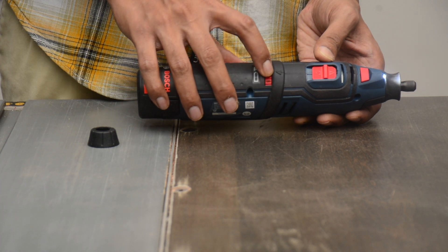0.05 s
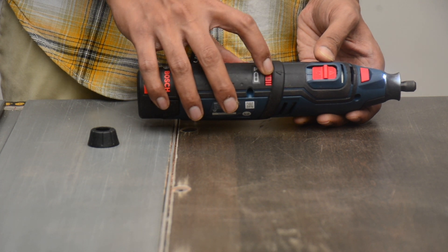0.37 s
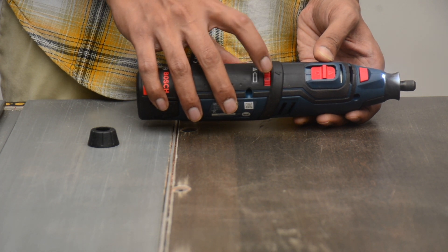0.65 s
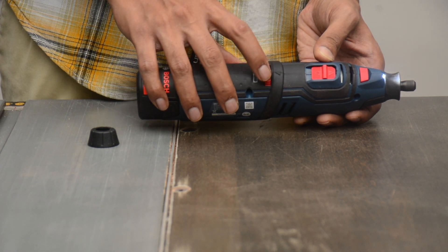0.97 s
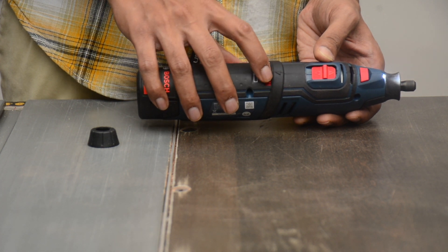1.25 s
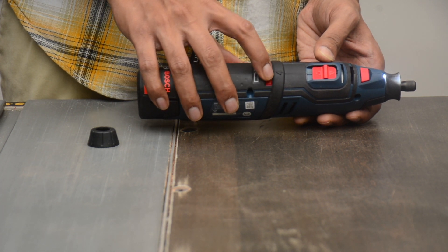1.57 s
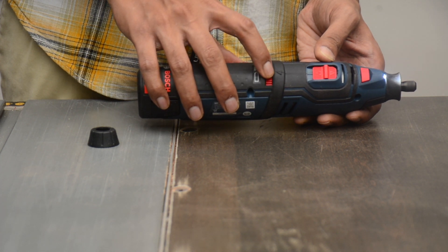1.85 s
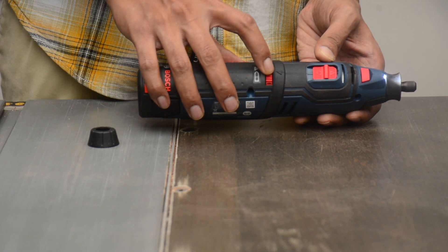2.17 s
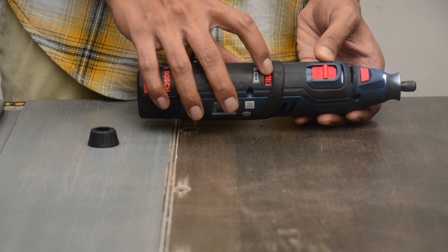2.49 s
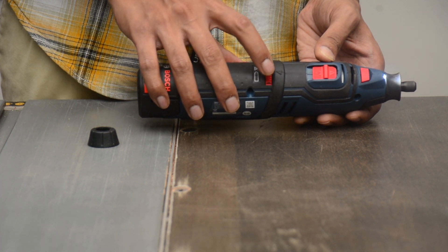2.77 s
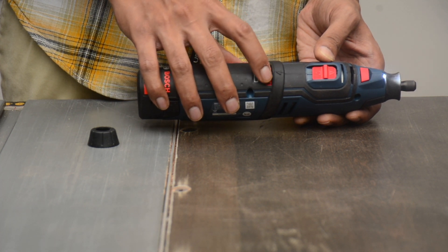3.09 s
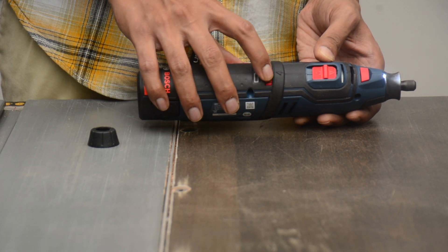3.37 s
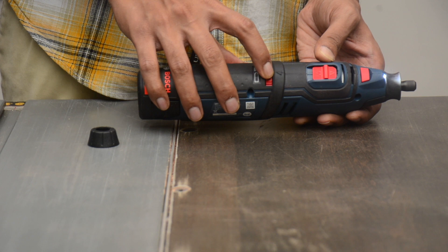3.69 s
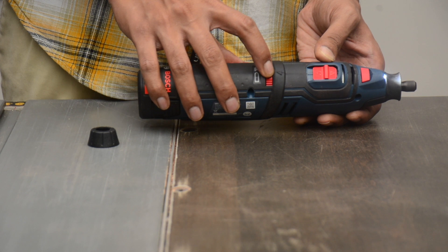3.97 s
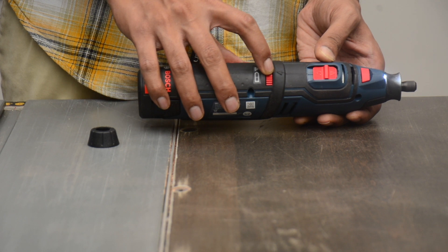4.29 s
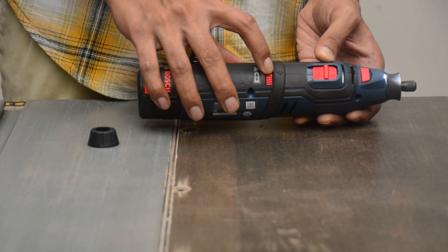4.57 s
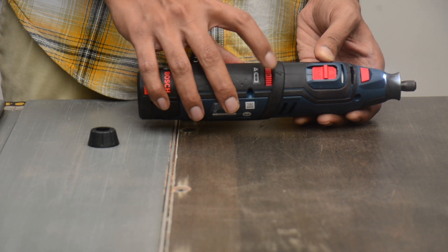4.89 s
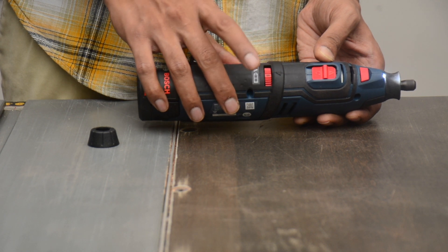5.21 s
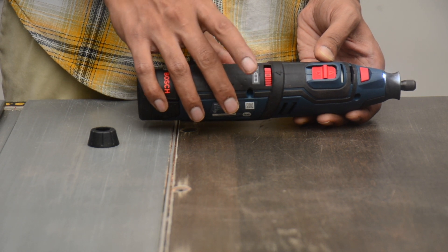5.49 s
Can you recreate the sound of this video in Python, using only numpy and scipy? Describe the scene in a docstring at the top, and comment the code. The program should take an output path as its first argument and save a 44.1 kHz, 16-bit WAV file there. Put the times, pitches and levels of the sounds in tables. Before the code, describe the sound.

A small cordless rotary tool runs with no load for the whole five and a half seconds, heard close with light workshop reflections. Its sound is a high motor whine over a steady rush of air, with a weaker hum and fine electric buzz underneath. At about 0.1 seconds the pitch glides up a little with a brief squeak, then holds. It steps up again at about 1.6, 2.0 and 2.3 seconds, and the whine becomes more prominent. A last rise comes at about 3.5 seconds, with the whine strongest around 3.7 seconds. Each rise brings a slight flutter, rasp and faint sizzle. The tool then holds its highest pitch, the tone swelling and fading unevenly. The rush of air softens a little from about 5 seconds, and the motor is still running at the end.

```python
"""A small cordless rotary tool runs unloaded just above a steel table while a finger raises its speed
dial in steps. The motor whines on the 12th and 9th harmonics of its shaft rate, over a weaker hum,
commutator buzz and bearing tones. Cooling air and brushes rush through the resonant housing; the
brushes sizzle under acceleration, and harmonics squeak as they meet narrow resonances. Whenever the
pitch glides, the tones interfere with their workshop reflections and flutter."""
import sys
import numpy as np
from scipy import signal
from scipy.fft import rfft, irfft
from scipy.io import wavfile
from scipy.ndimage import uniform_filter1d

SR = 44100
rng = np.random.default_rng(int(sys.argv[2]) if len(sys.argv) > 2 else 0)


def wav_record(signal):
    """Record a signal, one row per channel, as 16-bit PCM in the file named by sys.argv[1]."""
    frames = np.transpose(np.atleast_2d(signal))
    bounded = np.clip(frames, -1, 1)
    # unit amplitude maps onto the largest positive 16-bit level
    quanta = np.round(bounded * 32767).astype(np.int16)
    wavfile.write(sys.argv[1], SR, quanta)


N = 244618
TIME = np.arange(N) / SR
FREQS = np.fft.rfftfreq(N, 1 / SR)

# Swell of the rush of air and brushes. Each row: time in seconds, gain in dB.
RUSH_SWELL = [(0.0, 1.7), (0.25, 3), (1.52, -1.4), (1.68, -0.8), (1.85, 2.5), (1.95, 1.2), (3.0, 3.5),
              (3.11, 0.3), (3.5, -1.9), (3.69, 2.5), (4.21, -2.5), (4.62, 0.4), (4.97, -2.5), (5.08, -5.5),
              (5.54, -4.5)]


def undb(db):
    """Amplitude grows tenfold for every 20 decibels."""
    return 10 ** (np.asarray(db) / 20)


def db_curve(table):
    """Linear interpolation in decibels makes each swell and fade exponential."""
    seconds, db = np.transpose(table)
    return np.interp(TIME, seconds, db)


def amplitude_curve(table):
    """Linear interpolation in amplitude gives round swells and sharp nulls."""
    seconds, db = np.transpose(table)
    return np.interp(TIME, seconds, undb(db))


def waver(rate_hz, order=2):
    """Low-pass filtered noise: random motion of unit spread that dies away above the given rate."""
    motion = irfft(rfft(rng.standard_normal(N)) / (1 + 1j * FREQS / rate_hz) ** order, N)
    return motion / motion.std()


def shaft_speed():
    """First-order lag: the motor approaches each new dial setting exponentially."""
    # Turns of the dial. Each row: start in seconds, new shaft rate in Hz, time constant in seconds.
    dial = [(.114, 394.06, .139), (1.622, 412.6, .085), (2.033, 440, .12), (2.266, 472.6, .102),
            (2.434, 476.1, .032), (3.533, 515.7, .093)]
    previous_hz = 374.7
    hz = np.full(N, previous_hz)
    for start, new_hz, lag in dial:
        hz += (new_hz - previous_hz) * (1 - np.exp(-np.maximum(TIME - start, 0) / lag))
        previous_hz = new_hz
    return hz * (1 + 0.000325 * waver(10.4))


def reflections(spread_s, strength, count=16):
    """Echoes from table and walls decay exponentially with their delay."""
    lags = spread_s * (np.arange(count) + rng.uniform(0.1986, 1, count)) / count
    gains = np.exp(-lags / spread_s)
    return lags, strength * gains / np.linalg.norm(gains)


def flutter(hz, echoes, hop=32):
    """Interference: echoes carry the earlier pitch, so a gliding tone beats; a steady one stays even."""
    lags, gains = echoes
    t, hz = TIME[::hop], hz[::hop]
    drift_hz = hz - np.interp(t - lags[-1], t, hz)
    gliding = np.tanh((drift_hz / 36) ** 2)
    cycles = np.cumsum(hz) * hop / SR
    reflected = sum(gain * np.exp(2j * np.pi * (np.interp(t - lag, t, cycles) - cycles + rng.random()))
                    for lag, gain in zip(lags, gains))
    field = 1 + gliding * reflected
    # the beats move the tone's energy about without adding any
    field /= np.sqrt(uniform_filter1d(abs(field) ** 2, int(.025 * SR / hop)))
    return np.interp(TIME, t, field)


def tone(hz, echoes, rough, shimmer, rough_hz):
    """Modulation: a motor tone shimmers slowly, and the rattling rotor adds noisy sidebands."""
    rattle = waver(rough_hz, order=1) + 1j * waver(rough_hz, order=1)
    rattle = signal.sosfilt(signal.butter(2, 700, fs=SR, output="sos"), rattle)
    phase = 2 * np.pi * (np.cumsum(hz) / SR + rng.random())
    modulation = 1 + shimmer * waver(20) + rough * rattle
    return np.sqrt(2) * np.real(modulation * flutter(hz, echoes) * np.exp(1j * phase))


def stutter(surge, rate_hz):
    """Amplitude modulation breaks a tone into bursts while the motor pulls, at about the same power."""
    depth = .62 * surge
    return (1 + depth * np.tanh(2 * waver(rate_hz))) / np.sqrt(1 + depth ** 2 / 2)


def whine(shaft_hz, surge, echoes):
    """Periodic forcing by the rotor's poles gives two strong tones that rasp while the motor pulls."""
    # The 12th harmonic swells and fades as the pitch moves and the hands shift the tool.
    # Each row: time in seconds, level in dB.
    main_levels = [(0, -70.2), (0.115, -66), (0.14, -44), (0.17, -73), (0.29, -45.5), (0.32, -39),
                   (0.35, -46), (0.61, -45), (0.65, -35.5), (0.86, -48), (1.38, -45.5), (1.46, -54),
                   (1.8, -60.9), (2.26, -44.5), (2.285, -62), (2.54, -44.5), (2.58, -35), (2.63, -40.5),
                   (2.68, -31), (2.87, -46), (3.07, -37.5), (3.53, -50.5), (3.62, -43.5), (3.67, -36),
                   (3.72, -67), (3.735, -26.5), (3.82, -33.4), (4.04, -31.5), (4.31, -38), (4.4, -77),
                   (4.51, -36.5), (4.59, -56), (4.66, -37), (4.76, -35), (4.81, -43), (4.91, -53.5),
                   (4.945, -32), (5.0, -38), (5.27, -49.5), (5.34, -41), (5.54, -54.5)]
    # The 9th harmonic. Each row: time in seconds, level in dB.
    lower_levels = [(0, -65.5), (0.6, -62), (0.85, -54), (1.68, -57), (1.94, -44.5), (2.08, -78),
                    (2.115, -40), (2.14, -69), (2.17, -42.5), (2.33, -36), (2.37, -76), (2.395, -33),
                    (2.44, -44.5), (2.62, -39), (2.8, -48), (3.66, -65), (3.7, -46), (3.86, -68),
                    (4.15, -54), (4.24, -69), (4.44, -58.5), (5.54, -76)]
    rasp = 1 + 0.41 * surge
    main = tone(12 * shaft_hz, echoes, rough=.1 * rasp, shimmer=.1, rough_hz=70)
    lower = tone(9 * shaft_hz, echoes, rough=.13 * rasp, shimmer=.14, rough_hz=60)
    out = 0
    for partial, levels in ((main, main_levels), (lower, lower_levels)):
        unsteady = stutter(surge, rate_hz=14.8) * undb(2.2 * np.tanh(waver(15)))
        out += amplitude_curve(levels) * unsteady * partial
    return out


def hum(shaft_hz, surge, echoes, follows_rush=0.57, surge_db=1):
    """Rotor imbalance forces shaft harmonics, which swell with the rush and the motor's pull."""
    # Shaft rates in Hz at which the levels are given.
    speeds_hz = (375, 394, 413, 435, 476, 516)
    # Each row: multiple of the shaft rate, then level in dB before the swell at each of the six rates.
    harmonics = [(1, -79, -78, -77.5, -78, -77.5, -69.5), (2, -64, -66, -53.5, -58, -59, -62.5),
                 (3, -60, -62, -65.5, -57, -63.5, -58.5), (4, -62.5, -71.5, -69, -83, -63.5, -72),
                 (15, -69, -66.5, -79, -62, -61, -69.5)]
    swell_db = follows_rush * db_curve(RUSH_SWELL) + surge_db * surge
    out = 0
    for multiple, *levels_db in harmonics:
        gain = undb(np.interp(shaft_hz, speeds_hz, levels_db) + swell_db) * stutter(surge, rate_hz=3.6)
        out += gain * tone(multiple * shaft_hz, echoes, rough=0.076, shimmer=0.2, rough_hz=30.4)
    return out


def buzz(shaft_hz, echoes):
    """Uneven brush contact modulates the weak commutator harmonics; the higher ones flicker more."""
    # Low, middle and high shaft rate in Hz.
    speeds_hz = (394, 476, 516)
    # Each row: multiple of the shaft rate, then relative level in dB at each of the three rates.
    harmonics = [(5, -67, -78, -76), (6, -65, -65, -72), (7, -88, -80, -74), (10, -75, -73, -78),
                 (11, -81, -69, -71), (13, -73, -65, -79), (14, -78, -88, -69), (16, -75, -76, -79),
                 (17, -77, -82, -75), (18, -69, -69, -80), (19, -71, -76, -78), (20, -76, -78, -88),
                 (21, -73, -82, -83), (22, -79, -78, -81), (23, -78, -84, -81), (24, -75, -76, -80),
                 (25, -85, -76, -85), (26, -82, -81, -88), (27, -79, -85, -79), (28, -78, -87, -87),
                 (30, -80, -79, -85), (32, -82, -88, -88), (33, -81, -88, -88), (35, -81, -88, -88),
                 (37, -79, -88, -88), (38, -81, -88, -88), (39, -83, -88, -88)]
    flicker = (waver(24) + 1j * waver(31)) / np.sqrt(2)
    out = 0
    for multiple, *levels_db in harmonics:
        hz = multiple * shaft_hz
        flicker_share = min(multiple / 65, .6)
        contact = np.sqrt(1 - flicker_share) + np.sqrt(flicker_share) * np.roll(flicker, rng.integers(N))
        db = np.interp(shaft_hz, speeds_hz, levels_db) + 2.0 * waver(6.7)
        carrier = np.exp(2j * np.pi * np.cumsum(hz) / SR)
        out += undb(db) * np.real(contact * flutter(hz, echoes) * carrier)
    return np.sqrt(2) * undb(-0.5) * out


def housing(hz):
    """Resonance: each mode of the plastic housing shapes the gain with a Lorentzian curve."""
    # Each row: centre frequency in Hz, bandwidth in Hz, lift in dB.
    modes = [(710, 97, 13.5), (828, 39, 11), (1114, 144, 8.5), (1490, 39, 3), (1822, 38, 7), (1980, 130, 3),
             (2497, 68, 6.5), (2930, 166, 2), (4350, 490, -1.5), (6150, 45, 11)]
    return 1 + sum((undb(db) - 1) / (1 + (2 * (hz - centre) / width) ** 2) for centre, width, db in modes)


def bearing(shaft_hz):
    """Inharmonic ball bearing tones wander as the balls slip; they bloom on the housing's resonances."""
    # Each row: multiple of the shaft rate, level in dB before the housing and the swell of the rush.
    partials = [(1.845, -86), (2.125, -70.5), (4.27, -84), (5.14, -71), (6.12, -74), (6.23, -73)]
    out = 0
    for multiple, db in partials:
        hz = multiple * shaft_hz * (1 + 0.00201 * waver(18.0))
        gain = undb(db + 1.7 * waver(13.0)) * housing(hz)
        out += gain * np.sin(2 * np.pi * np.cumsum(hz) / SR)
    return out * undb(0.85 * db_curve(RUSH_SWELL))


def rush(shaft_hz, angle, echoes, cruise_hz=450):
    """Source and filter: air and brush noise, pulsing once a turn, is shaped by housing and echoes."""
    # Smooth spectrum of the source. Each row: frequency in Hz, spectral density level in dB.
    source_colour = [(25, -130), (60, -121), (150, -115), (250, -107), (450, -95.5), (700, -96.5),
                     (1500, -91), (3300, -95.5), (5800, -93), (8500, -93), (11000, -99), (15500, -107)]
    # The rush brightens with speed. Each row, for the low, middle and high band: gain in dB at
    # cruise_hz, change in dB per Hz of shaft rate.
    band_gains = [(-2.68, -0.012), (2, 0.0069), (-0.5, 0.0136)]
    hz, db = np.transpose(source_colour)
    colour = undb(np.interp(np.log(FREQS + 1), np.log(hz), db)) * housing(FREQS) * np.sqrt(SR / 2)
    comb = 1 + 0.48 * sum(gain * np.exp(-2j * np.pi * FREQS * lag) for lag, gain in zip(*echoes))
    scrape = rng.standard_normal(N) * (1 + 0.097 * np.cos(angle))
    spectrum = rfft(scrape / scrape.std()) * colour * comb / np.sqrt(np.mean(abs(comb) ** 2))
    low = 1 / (1 + (FREQS / 1300) ** 4)
    high = 1 - 1 / (1 + (FREQS / 5000) ** 4)
    out = 0
    for band, (band_db, slope) in zip((low, 1 - low - high, high), band_gains):
        gain = undb(band_db + slope * (shaft_hz - cruise_hz) + 0.44 * waver(8.3))
        out += gain * irfft(spectrum * band, N)
    return out * undb(db_curve(RUSH_SWELL))


def sparks(surge):
    """Sparking at the brushes gives a high band of noise under accelerating current."""
    band = np.exp(-((FREQS - 14000) / 2000) ** 2)
    sizzle = irfft(rfft(rng.standard_normal(N)) * band, N)
    return undb(-70 + 3 * waver(25)) * surge * sizzle / sizzle.std()


def squeaks(angle):
    """Passage through a narrow resonance: at set times one shaft harmonic swells, trembles and fades."""
    # Each row: time of the peak in seconds, multiple of the shaft rate, half-power length in seconds,
    # level in dB before the tremble.
    passages = [(0.138, 31, .017, -49), (0.137, 3, 0.061, -42.5), (0.204, 31, .02, -50.5),
                (.29, 18, 0.12, -54), (.29, 30, 0.054, -57), (0.345, 3, 0.048, -44), (.6, 39, .08, -59),
                (1.675, 3, .04, -47), (1.72, 38, .1, -62), (1.81, 32, .1, -62), (1.86, 33, .1, -59),
                (2.12, 31, 0.076, -59), (2.14, 32, .2, -58), (2.608, 30, .1, -61), (3.6, 30, 0.081, -62),
                (3.668, 24, .1, -56), (3.7, 15, .035, -44)]
    tremble = .6 + .45 * (waver(30) + 1j * waver(30))
    out = np.zeros(N)
    for peak, multiple, length, db in passages:
        near = abs(TIME - peak) < 2 * length
        swell = np.exp(-2 * np.log(2) * ((TIME[near] - peak) / length) ** 2)
        own_tremble = np.roll(tremble, rng.integers(N))[near]
        out[near] += undb(db) * swell * np.real(own_tremble * np.exp(1j * multiple * angle[near]))
    return out


def scene():
    """Superposition of layers all driven by the shaft speed; both channels carry the same sound."""
    shaft_hz = shaft_speed()
    angle = 2 * np.pi * np.cumsum(shaft_hz) / SR
    acceleration = np.maximum(np.gradient(shaft_hz) * SR, 0)
    surge = np.tanh(uniform_filter1d(acceleration, SR // 12) / 90)  # extra motor current, 0 to 1
    echoes = reflections(spread_s=.085, strength=.8)
    tones = whine(shaft_hz, surge, echoes) + hum(shaft_hz, surge, echoes) + buzz(shaft_hz, echoes)
    tool = tones + squeaks(angle) + bearing(shaft_hz) + rush(shaft_hz, angle, echoes) + sparks(surge)
    return np.array([tool, tool])


def record(dry):
    """Band limiting: a steep elliptic low-pass filter cuts the highest treble."""
    cutoff_hz = 15750
    return signal.sosfilt(signal.ellip(12, .1, 80, cutoff_hz, fs=SR, output="sos"), dry)


dry = scene()
out = record(dry)
wav_record(out)
```